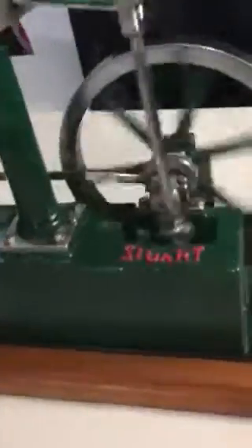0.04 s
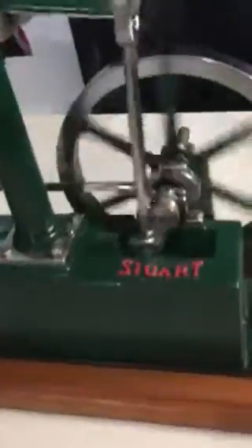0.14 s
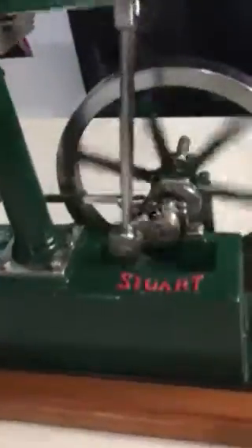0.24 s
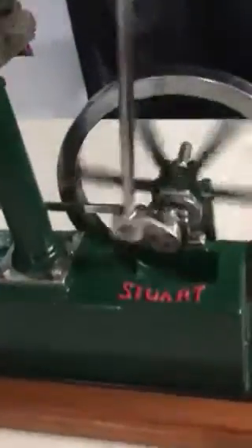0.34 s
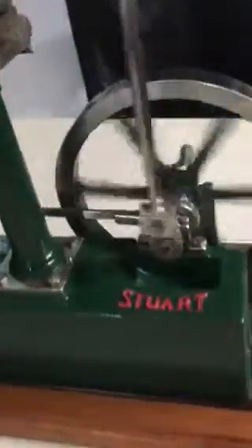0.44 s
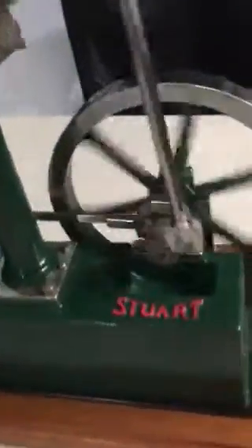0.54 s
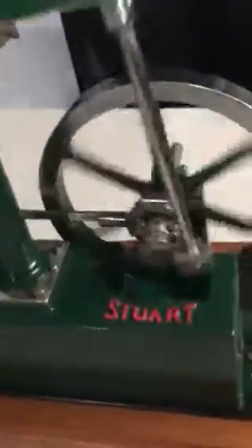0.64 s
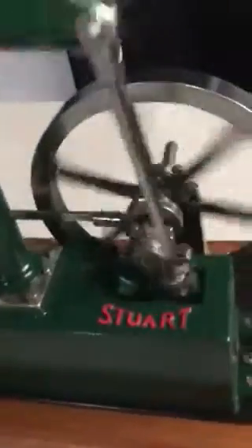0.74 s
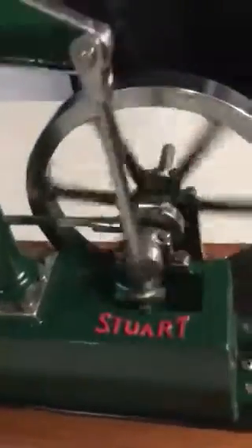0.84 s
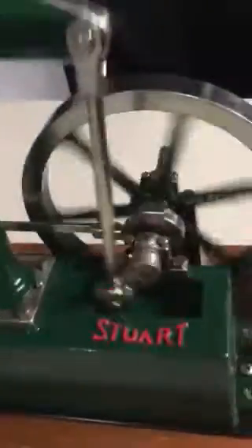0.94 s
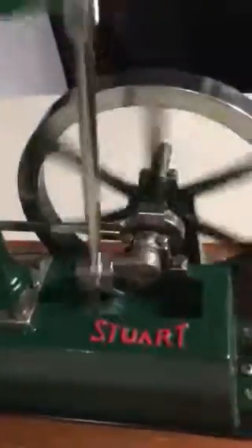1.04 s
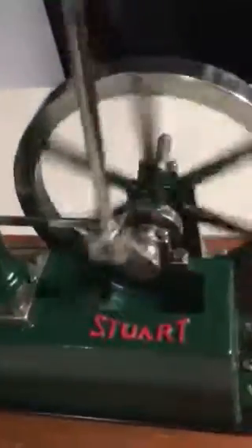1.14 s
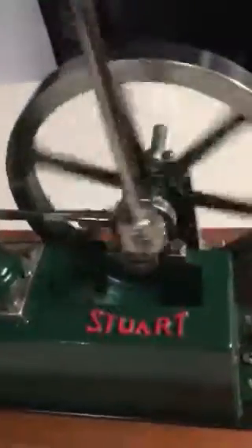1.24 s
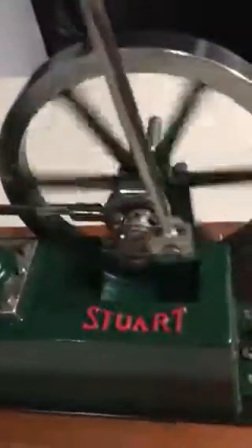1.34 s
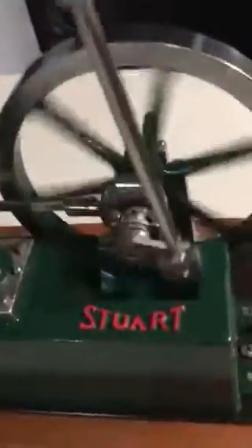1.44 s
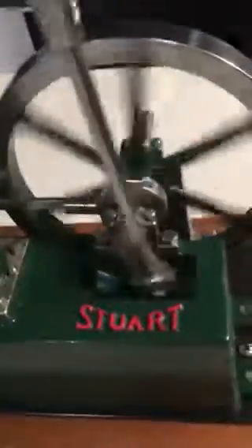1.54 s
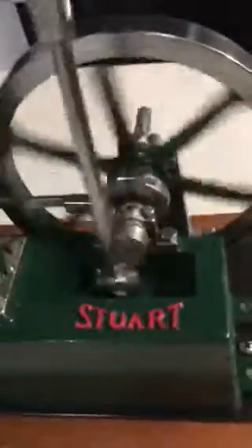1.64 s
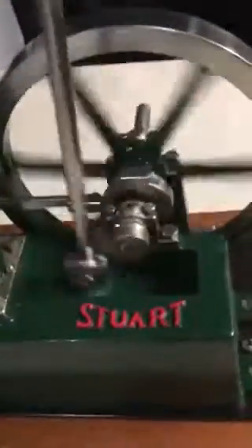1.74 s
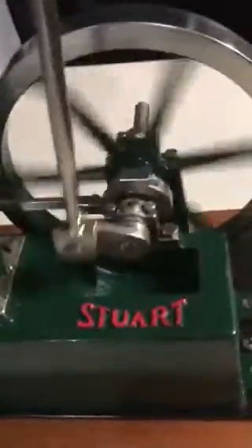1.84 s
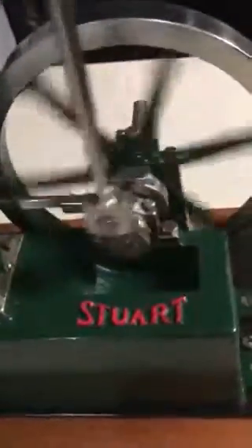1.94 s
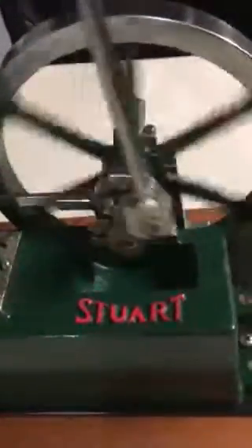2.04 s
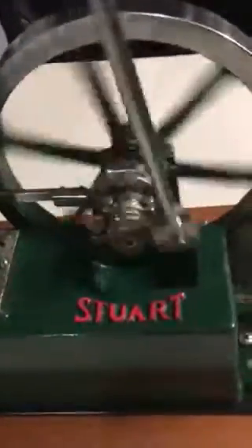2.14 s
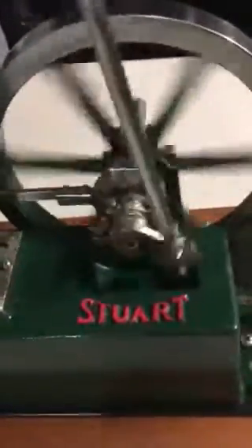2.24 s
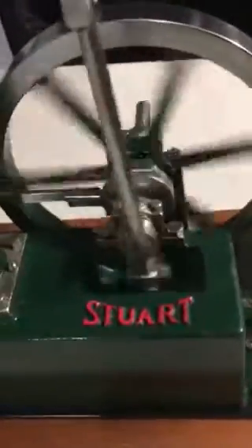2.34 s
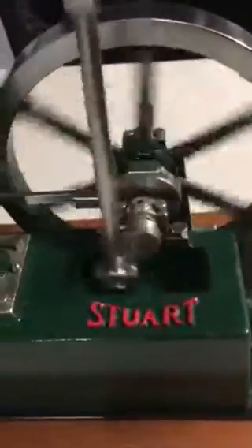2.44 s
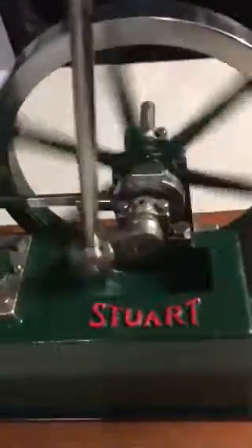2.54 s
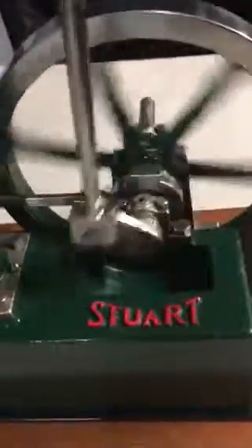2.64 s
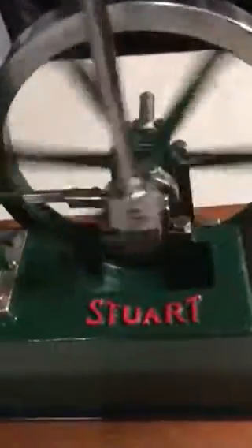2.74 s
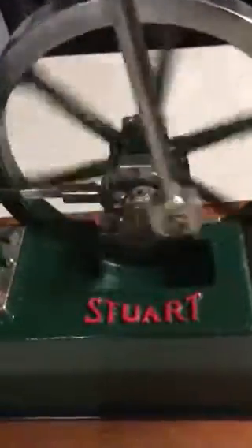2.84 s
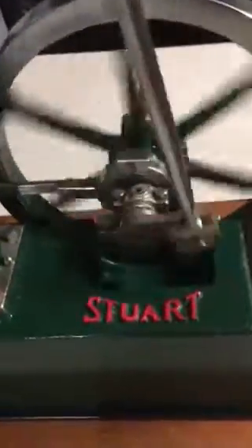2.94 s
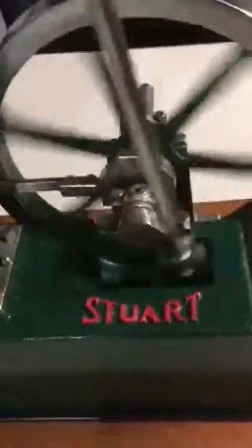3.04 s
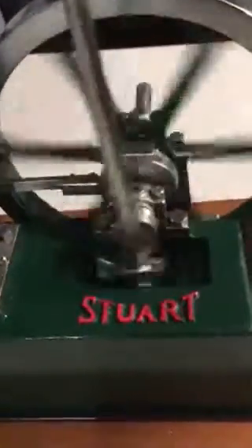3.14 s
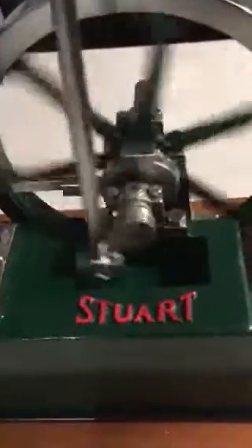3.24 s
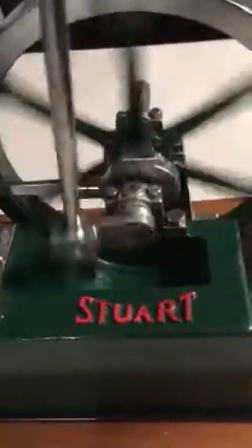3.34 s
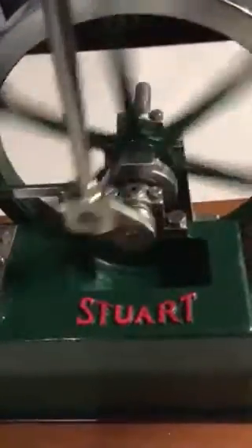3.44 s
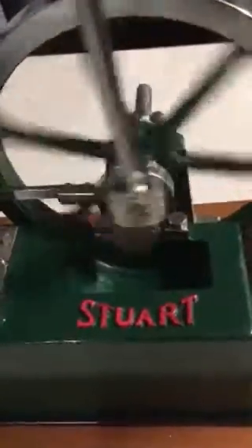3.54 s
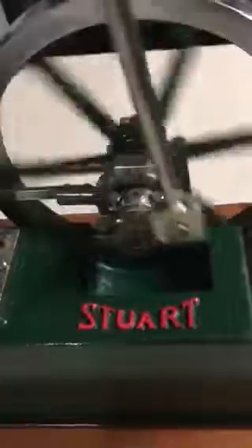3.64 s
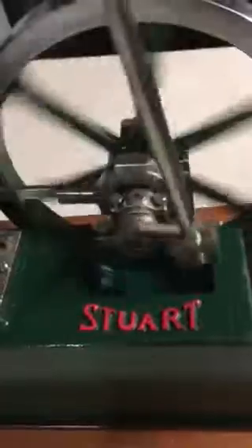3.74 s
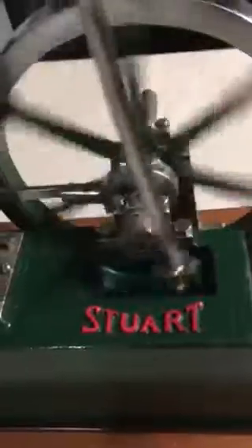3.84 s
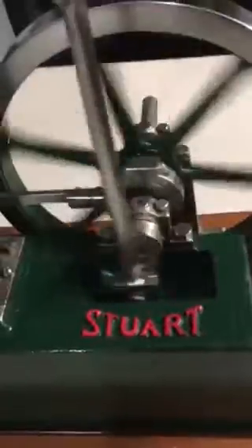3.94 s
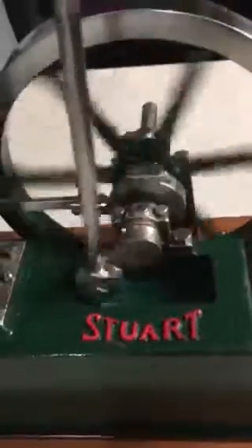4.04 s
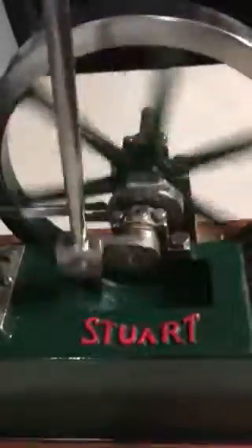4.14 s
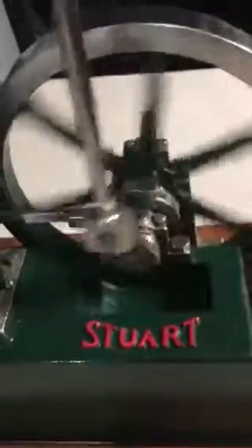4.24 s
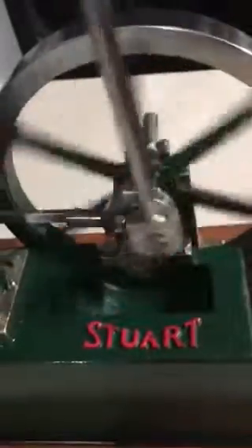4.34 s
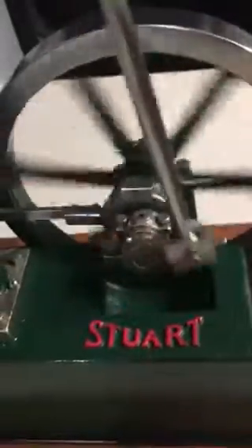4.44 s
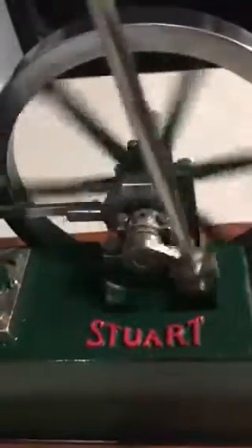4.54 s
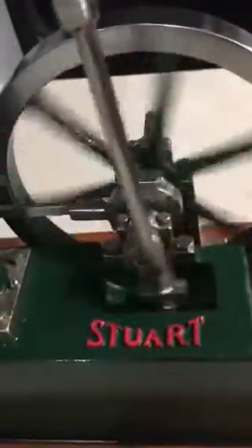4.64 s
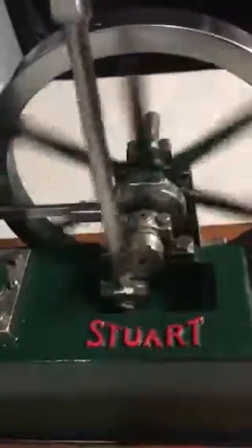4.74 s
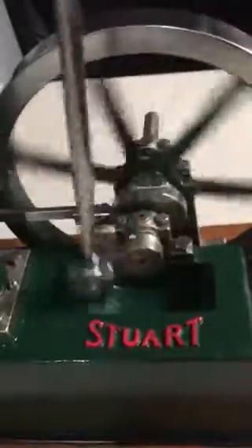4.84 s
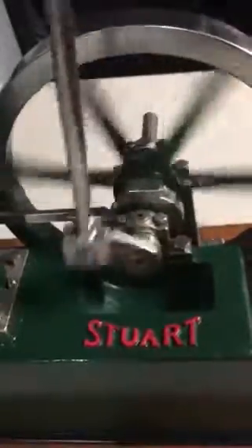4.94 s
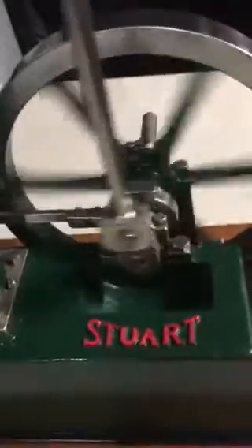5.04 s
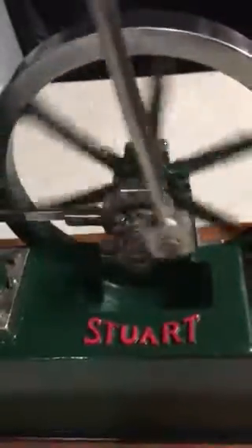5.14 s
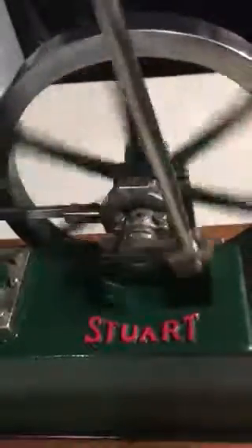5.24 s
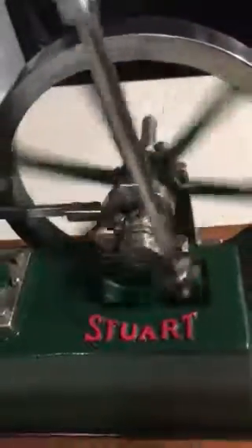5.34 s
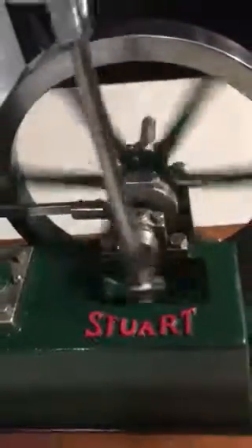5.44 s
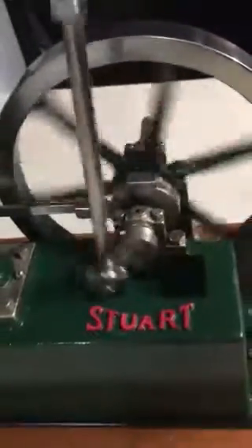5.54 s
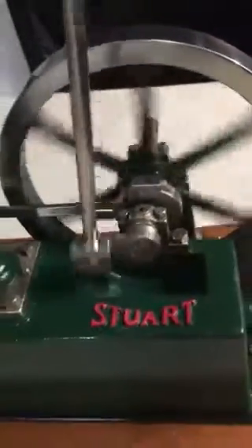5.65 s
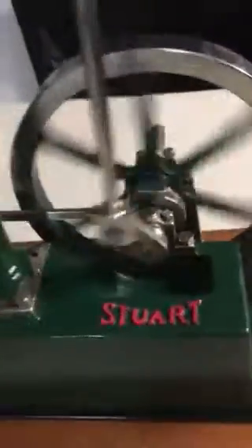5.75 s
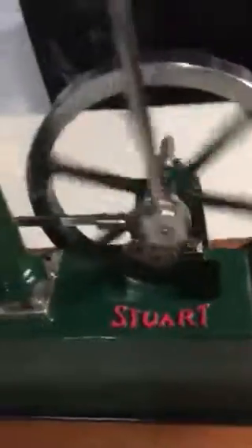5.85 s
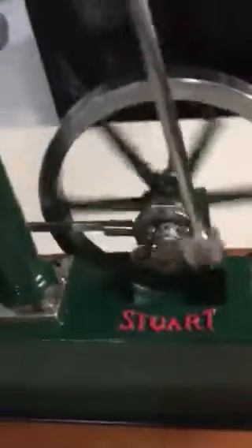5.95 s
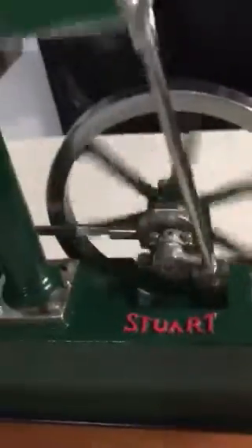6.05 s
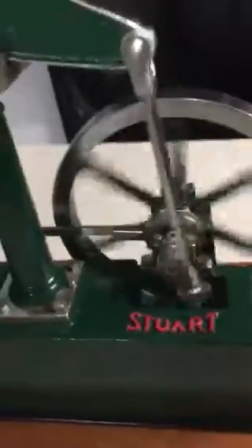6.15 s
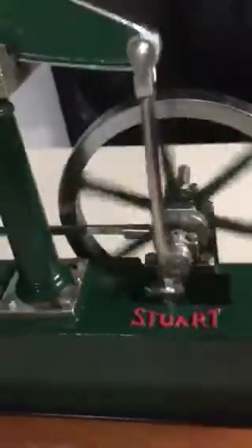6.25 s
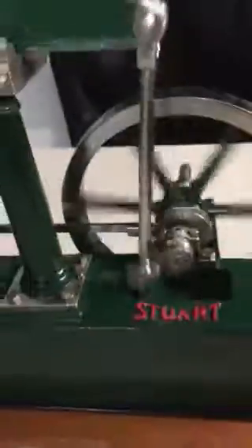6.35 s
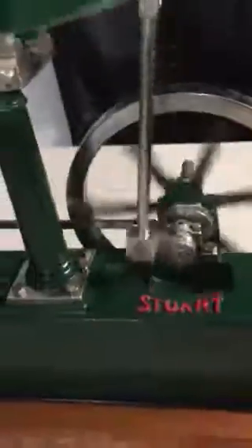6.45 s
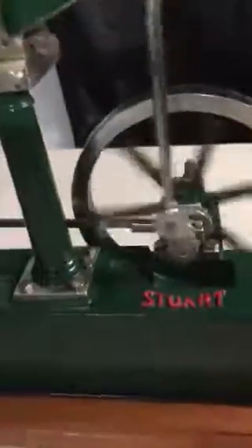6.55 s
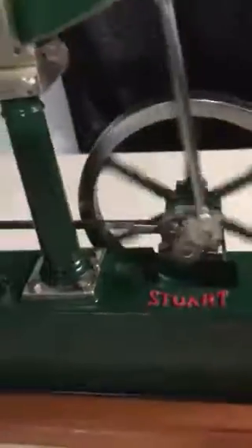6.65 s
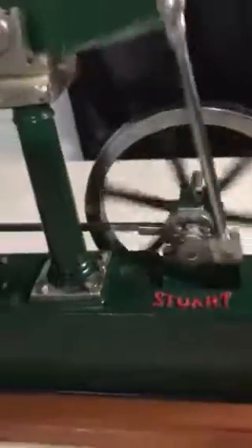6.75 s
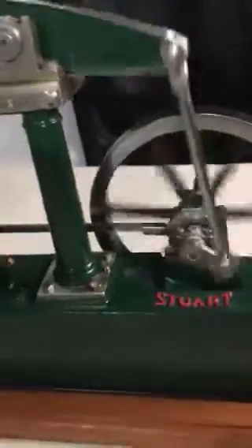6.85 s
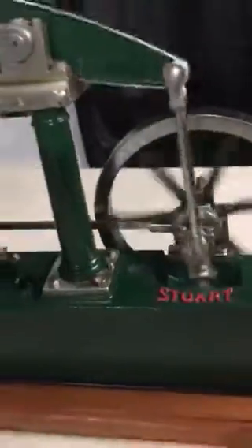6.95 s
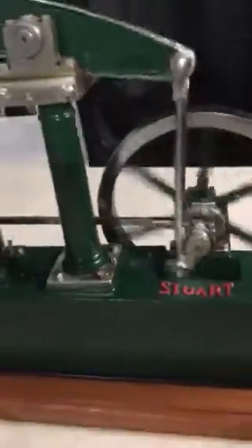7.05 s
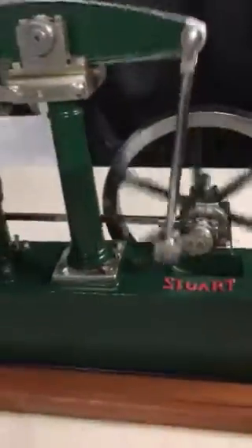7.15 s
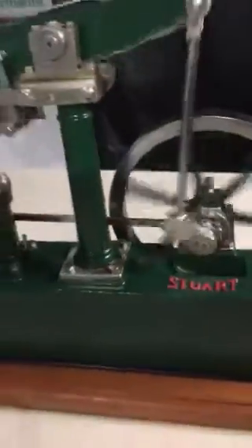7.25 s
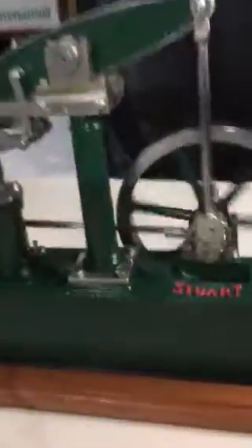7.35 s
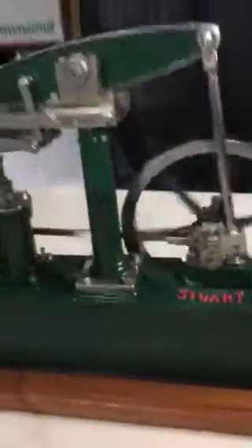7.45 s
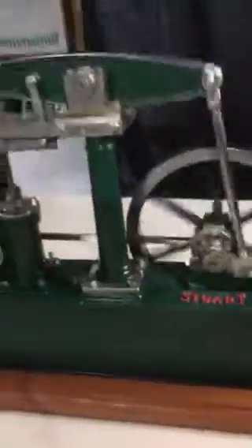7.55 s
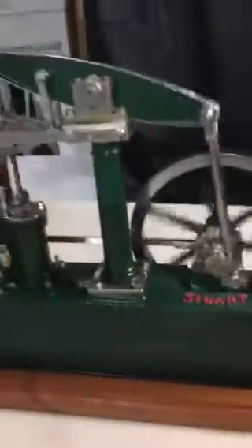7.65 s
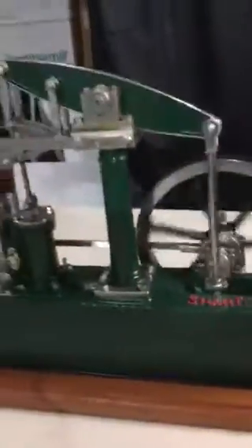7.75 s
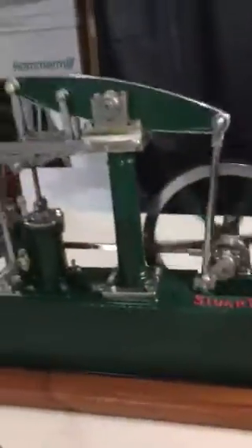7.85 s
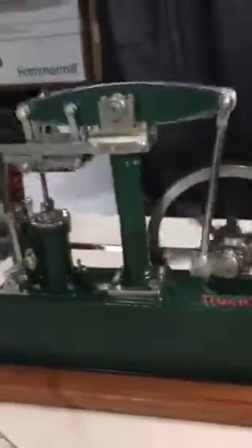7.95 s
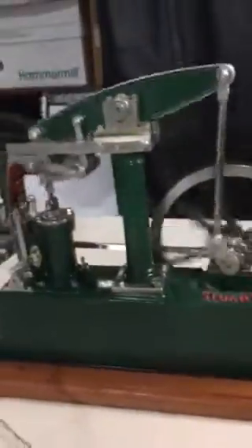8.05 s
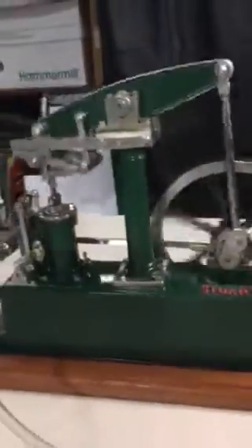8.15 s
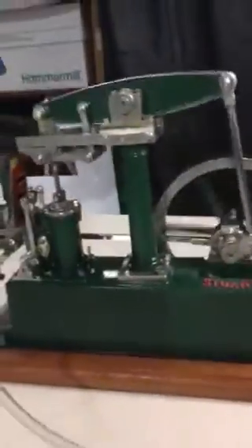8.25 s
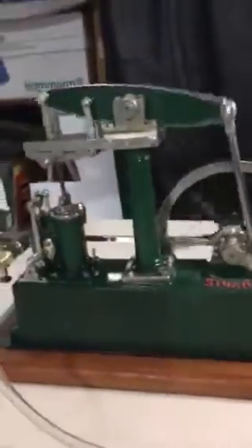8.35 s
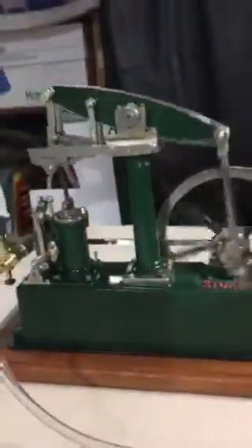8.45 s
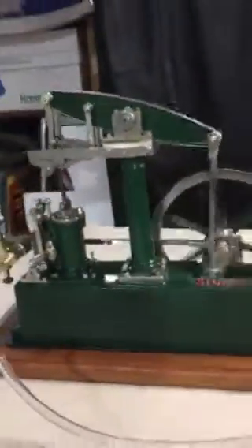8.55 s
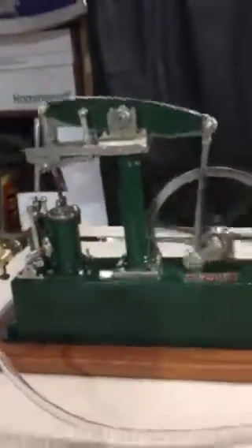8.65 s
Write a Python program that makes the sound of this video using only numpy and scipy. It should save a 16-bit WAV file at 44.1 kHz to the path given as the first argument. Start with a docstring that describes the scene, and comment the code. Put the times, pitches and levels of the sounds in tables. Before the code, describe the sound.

Evenly repeating metallic ticks, sharp knocks and softer taps from a model steam engine on a wooden table, with a light pulsing hiss.

```python
"""A hiss of exhaust, soft taps, then a sharp knock: a model beam engine at about 80 turns a minute.
It stands on a wooden table in a small furnished room. Play in its bearings is taken up at the same
crank angles every turn: a few ticks, one knock, softer taps on the way back. The blows ring steel,
rod, bed casting, plinth and table; the exhaust hisses twice a turn. The microphone, a hand-held phone,
starts beside the cylinder, moves in to 16 cm from the crank and backs off to 38 cm late on."""
import sys
import numpy as np
from scipy import signal
from scipy.fft import rfft, irfft, next_fast_len
from scipy.io import wavfile
from scipy.ndimage import uniform_filter1d

SR = 44100
rng = np.random.default_rng(int(sys.argv[2]) if len(sys.argv) > 2 else 0)


def master(y):
    """Save y as 16-bit WAV."""
    cut = np.clip(np.atleast_2d(y).T, -1, 1)
    pcm = np.round(cut * 32767)  # scale
    wavfile.write(sys.argv[1], SR, pcm.astype(np.int16))


N = 383669
T = np.arange(N) / SR

# the crank bearing's knock, once a turn: (time [s], knock gain [dB], gain of its lead-in contacts [dB])
KNOCKS = [(0.61, 1, 1.5), (1.3717, -2.5, 2.5), (2.136, -.5, 0.5), (2.9071, 1, 2), (3.6603, 0.8, -11),
          (4.4319, 0, 0.5), (5.1936, -0.5, 1.5), (5.9535, 0, -1.5), (6.7151, -1, -1), (7.4782, 1, 0.5),
          (8.244, -1, 0)]
# microphone path: (time [s], distance from the crank [m], towards the cylinder [0-1], hiss gain [dB])
MIC_PATH = [(0, 0.18, 1, -2.5), (.4, 0.26, 0.53, -2.5), (.8, .18, 0, -2.5), (5.6, 0.16, 0, -2.5),
            (6.2, .19, 0.29, -2.5), (6.8, 0.2, 0.86, -2), (7.6, 0.3, 0.86, -1.5), (8.2, 0.29, 0.88, -4),
            (8.7, 0.38, 0.6, -5.5)]


def bearings(close_m=.17, scatter_db=1.16, snap_s=.2182, snap_db=-33):
    """Play is taken up by the same contacts every turn; the blows fade as the microphone backs off."""
    # contacts within the ticks, the lead-in, the knock and the return taps:
    # (delay [s], chatter [s], steel [dB], rod [dB], bed [dB], plinth [dB], table [dB])
    tick_contacts = [(0, 0.0011, -45.5, -41.5, -44, -54.5, -52), (.006, 0.0011, -52, -50.5, -45, -64, -82),
                     (0.0163, .0006, -52, -51, -66, -52, -63), (.028, 0.0097, -46, -50, -47.5, -56, -73)]
    lead_contacts = [(-.0315, 0.0011, -48.5, -42.5, -39, -40.5, -46.5),
                     (-.0079, 0.00039, -33.5, -40.5, -36.5, -38, -50),
                     (-.0022, 0.0014, -36, -38.5, -30, -41.5, -72)]
    knock_contacts = [(0, 0.00051, -26, -42, -22, -25.5, -32.5), (.0016, 0.0014, -38, -25, -27.5, -50, -80),
                      (0.082, 0.0047, -70, -74, -49.5, -43, -44.5)]
    return_contacts = [(-.0695, 0.00095, -65, -36.5, -43, -66, -60.5),
                       (-.0008, 0.00034, -57, -34.5, -40.5, -39.5, -47.5),
                       (.011, 0.0019, -72, -56, -46.5, -53, -40),
                       (0.063, 0.0029, -46, -44, -46, -39.5, -38.5),
                       (0.076, 0.0072, -45, -43, -38.5, -41.5, -39.5),
                       (0.088, 0.0062, -50, -66, -66, -38.5, -42.5),
                       (0.105, 0.01, -68, -77, -75, -39.5, -42)]
    knocks = np.array(KNOCKS)
    ticks = each_turn(lag_s=-.0768, db=2.5, late_s=.0223)  # the valve gear, ahead of each knock
    groups = [(ticks, tick_contacts), (knocks[:, [0, 2]], lead_contacts),
              (knocks[:, [0, 1]], knock_contacts), (returns(), return_contacts)]
    forces = np.zeros((5, N))
    # how far each part follows a blow's gain: wide wooden boards sound much the same from everywhere
    follows = [1.3, 1, .83, .38, .38]
    for events, contacts in groups:
        for s, close_db in events:
            distance_m = curves(MIC_PATH, s)[0]
            db = close_db + 20 * np.log10(close_m / distance_m)
            for delay, chatter, *parts_db in contacts:
                force = contact(chatter) * undb(scatter_db * rng.standard_normal())
                for track, part_db, follow in zip(forces, parts_db, follows):
                    add(track, s + delay, force * undb(part_db + follow * db))
    # one tap lands hard and bright, on steel alone
    snap = signal.lfilter(*signal.butter(3, 12000, "high", fs=SR), contact(.0002))
    add(forces[0], snap_s, snap * undb(snap_db))
    return ringing_parts(forces)


def contact(chatter_s, clean_s=.0013, crossover_hz=800):
    """Force of one contact: a push whose treble is a clean blow when brief, a scrape when long."""
    t = T[:SR // 16]
    blow = signal.unit_impulse(len(t))
    scrape = rng.standard_normal(len(t)) * np.exp(-t / chatter_s)
    scrape_share = chatter_s ** 2 / (chatter_s ** 2 + clean_s ** 2)
    rough_blow = blow * np.sqrt(1 - scrape_share) + scrape * np.sqrt(scrape_share / np.sum(scrape ** 2))
    low, high = (signal.butter(2, crossover_hz, kind, fs=SR) for kind in ("low", "high"))
    push = signal.lfilter(*low, signal.lfilter(*low, blow))
    treble = signal.lfilter(*high, signal.lfilter(*high, rough_blow))
    return push + treble


def ringing_parts(forces):
    """Five parts ring. Bending waves are slower at low pitch: the steel speaks first, the table last."""
    # modes of each part: (frequency [Hz], relative level [dB], t60 [s])
    steel = [(4680, -9, 0.0091), (5860, -3, 0.0064), (6690, 4, 0.0057), (7014, 2.5, 0.0063),
             (8050, 3.5, 0.0033), (9200, 1.5, 0.003), (10000, -2, 0.0041), (11560, 1.5, 0.0031),
             (13660, 1.5, 0.0022)]
    rod = [(1680, -0.5, 0.013), (2037, 0, 0.014), (2210, 0.5, 0.015), (2690, 0, 0.0081),
           (3320, -11.5, 0.014), (4056, -5.5, 0.01), (5540, -2.5, 0.0066), (6620, -4.5, 0.0059)]
    bed_casting = [(730, -8, 0.019), (948, -7, 0.025), (1172, 1.5, 0.011), (1574, 2, 0.02),
                   (2005, 6.5, 0.011), (2550, 2, 0.012), (2820, -4.5, 0.0094), (3250, -6.5, 0.0073),
                   (3875, -0.5, 0.0093)]
    wooden_plinth = [(196, 0.5, 0.065), (241, 0, 0.029), (339, -8.5, 0.042), (404.7, -13, 0.044),
                     (485, -15.5, 0.049), (638, -12, 0.061), (779, -13.5, 0.034), (976, -9.5, 0.025)]
    wooden_table = [(138.7, -0.5, 0.17), (177, -12, 0.21), (206.3, -4, 0.22), (236.6, -4.5, 0.072),
                    (279.7, -5, 0.11), (325, -12, 0.12), (388.7, -13.5, 0.093)]
    rings = [ring(steel, rise_s=.000067, lag_s=.00003),
             ring(rod, rise_s=.0023, lag_s=.000321),
             ring(bed_casting, rise_s=.00063, lag_s=.000812),
             ring(wooden_plinth, rise_s=.0018, lag_s=.0012),
             ring(wooden_table, rise_s=.029, lag_s=.0028)]
    return sum(signal.oaconvolve(force, body)[:N] for force, body in zip(forces, rings))


def ring(modes, rise_s, lag_s):
    """A part's answer to one blow: its modes swell as the wave spreads through it, then fade."""
    t = np.maximum(T[:SR // 3] - lag_s, 0)
    # neighbouring modes swing in opposite directions where they radiate
    y = sum((-1) ** k * undb(db) * np.sin(2 * np.pi * hz * t) * np.exp(-np.log(1000) * t / t60)
            for k, (hz, db, t60) in enumerate(modes))
    y = y * (1 - np.exp(-t / rise_s))
    return y / np.sqrt(np.sum(y ** 2) / (SR / 200))  # the energy of 5 ms at rms 1


def turn_starts(turn_s=.7645):
    """Times of the knocks, with one more flywheel turn before and after."""
    s = np.array(KNOCKS)[:, 0]
    return np.r_[s[0] - turn_s, s, s[-1] + turn_s]


def each_turn(lag_s, db, late_s, bind_from_s=3.0, bind_to_s=4.15):
    """Rows (time [s], gain [dB]) of an event that comes every turn, late while the engine binds."""
    s = turn_starts() + lag_s
    s = s + late_s * ((s > bind_from_s) & (s < bind_to_s))
    return [(at, db) for at in s if 0 < at < T[-1]]


def returns():
    """The load reverses once on every way back."""
    return each_turn(lag_s=.2984, db=.83, late_s=.0055)


def crank_angle():
    """Crank angle in turns since the last knock."""
    s = turn_starts()
    return np.interp(T, s, np.arange(len(s))) % 1


def exhaust(turn, beside, flutter_db=.82, band_flutter_db=1.5, near_bend=.14):
    """Each end of the cylinder empties through the pipe once a turn; the glands leak all the time."""
    # pipe resonances: (frequency [Hz], width [Hz], rise over a far-end stroke [share],
    # near-end level [dB], far-end level [dB], gain beside the cylinder [dB])
    pipe_modes = [(1395, 186, 0.0385, -51.5, -53, -4), (1751, 910, 0.00071, -52.5, -58.5, -0.5),
                  (3026, 143.5, 0.0015, -51, -56, -1.5), (3290, 690, 0, -57.5, -63, 7.5),
                  (4750, 620, 0.0006, -51.5, -58.5, -5.5), (5048, 255, 0, -54, -59, 10),
                  (5850, 540, 0.013, -51, -59, -3), (6320, 279, 0.0066, -52, -54, -7.5),
                  (7130, 430, 0.045, -56.5, -69, 3.5), (8030, 720, 0.049, -56, -58, -6.5),
                  (8510, 300, .03, -51.5, -58.5, -3.5), (9210, 280, 0.13, -56.5, -55, 1),
                  (9600, 360, 0.031, -56, -51, -29), (10580, 750, 0.11, -55.5, -56, -6),
                  (12800, 3100, 0, -56.5, -55.5, 0.5)]
    # spectrum of the gland leak: (frequency [Hz], relative level [dB])
    leak_spectrum = [(900, -7), (1400, -1), (2400, -6), (4000, -9.5), (6200, -3.5), (7400, -9), (9500, -1),
                     (11500, -6.5), (13000, 1), (15500, -8)]
    flow_db, far = valve(turn)
    # the piston shortens the emptying space, so its resonances rise, mostly at the far end
    stroke = ((2 * turn) % 1 - .5) * (near_bend + far * (1 - near_bend))
    pipe = np.zeros(N)
    for hz, width, rise, near_db, far_db, side_db in pipe_modes:
        band = resonance(hz * (1 + rise * stroke), width)
        band_db = near_db + far * (far_db - near_db) + beside * side_db
        pipe += band * undb(band_db + band_flutter_db * wander(45))
    # beside the cylinder the puffs arrive directly, with deeper gaps between them
    puff_db = flow_db * (1 + .11 * beside) - .4
    puffs = pipe * undb(puff_db + flutter_db * wander(90))
    leak = noise(leak_spectrum, N) * undb(-53 + .052 * flow_db - 5 * beside)
    return puffs + leak


def valve(turn, edge_turns=.012, outside_swell_db=-8.5, shut_db=-19):
    """Flow in dB and the far end's share: a port opens, flow swells with piston speed, the port shuts."""
    # puffs after a knock: (port opens [turns], flow peaks [turns], port closes [turns],
    # swell width [turns], level [dB], share from the cylinder's far end [0-1])
    puffs = [(-.02, 0.229, 0.41, .085, -1, 0), (0.528, 0.686, 0.85, 0.121, -3, 0.8),
             (0.909, .93, 0.95, .03, -7.5, 1)]
    flow, far_flow = undb(shut_db), undb(shut_db) / 2
    for opens, peaks, closes, width, db, far_share in puffs:
        angle = (turn - peaks + .5) % 1 - .5 + peaks
        port = (np.tanh((angle - opens) / edge_turns) - np.tanh((angle - closes) / edge_turns)) / 2
        swell = np.exp(-.5 * ((angle - peaks) / width) ** 2)
        puff = np.abs(port) * undb(db + outside_swell_db * (1 - swell))
        flow, far_flow = flow + puff, far_flow + far_share * puff
    return 20 * np.log10(flow), far_flow / flow


def rocking(return_db=-34.5, knock_db=-44, return_lag_s=.047, knock_lag_s=.0193, scatter_db=1.5):
    """The beam's weight changes sides twice a turn and gives the table a slow push."""
    # modes of the whole table swaying: (frequency [Hz], relative level [dB], t60 [s])
    sway_modes = [(56.7, -12, 0.5), (84.3, 6, 0.4), (112, -10, 0.11), (134.46, -8, 0.62)]
    track = np.zeros(N)
    for events, db, lag_s in ((returns(), return_db, return_lag_s), (KNOCKS, knock_db, knock_lag_s)):
        push = ring(sway_modes, rise_s=.05, lag_s=lag_s) * undb(db)
        for s, *_ in events:
            add(track, s, push * undb(scatter_db * rng.standard_normal()))
    return track


def shadow(blows, beside, depth=.22, hz=2500, width_hz=2600):
    """With the microphone beside the cylinder, column and casting screen off part of the crank's ring."""
    band = signal.lfilter(*signal.iirpeak(hz, hz / width_hz, fs=SR), blows)
    return blows - depth * beside * band


def room(blows, t60_s=.28, onset_s=.0012, wet_db=-14):
    """Dense, dull reflections from a small furnished room."""
    # colour of the reflections: (frequency [Hz], relative level [dB])
    echo_spectrum = [(60, -18), (150, 0.5), (350, -0.5), (550, -5), (1300, -2), (1900, -12), (2700, -18),
                     (5000, -14), (15000, -17)]
    t = T[:SR // 2]
    onset = 1 - np.exp(-(t / onset_s) ** 2)
    tail = noise(echo_spectrum, len(t)) * np.exp(-np.log(1000) * t / t60_s) * onset
    return signal.fftconvolve(blows, tail / np.sqrt(np.sum(tail ** 2)))[:N] * undb(wet_db)


def background(rush_rise_db_per_s=15.5):
    """The engine's wavering drone through the table, room rumble and a faint rush that swells late on."""
    # spectrum of the room's rumble: (frequency [Hz], relative level [dB])
    rumble_spectrum = [(20, -28), (40, -5), (60, -9), (85, -21), (110, 0), (200, -4.5), (350, -13),
                       (700, -14.5), (1500, -23), (5000, -23)]
    rush_db = -56.5 + rush_rise_db_per_s * (T - 8.85)
    hollow_rush = (resonance(620, 120) + undb(-6) * resonance(830, 410)) * undb(rush_db)
    rumble = noise(rumble_spectrum, N) * undb(-56.5)
    engine_drone = (resonance(58, 7) + resonance(84, 5.8)) * undb(-60)
    return rumble + engine_drone + hollow_rush


def resonance(hz, width_hz):
    """Turbulence in one resonance whose centre may move, rms 1."""
    offset = np.fft.fftfreq(next_fast_len(N), 1 / SR)
    inside = np.abs(offset) < 2 * width_hz
    spectrum = np.zeros(len(offset), complex)
    draws = rng.standard_normal((2, len(offset)))[:, inside]
    spectrum[inside] = (draws[0] + 1j * draws[1]) * .5 ** (2 * (offset[inside] / width_hz) ** 2)
    phase = 2 * np.pi * np.cumsum(np.broadcast_to(hz, N)) / SR
    return unit(np.real(np.fft.ifft(spectrum)[:N] * np.exp(1j * phase)))


def noise(spectrum, size):
    """Noise of a given spectrum, rms 1."""
    hz, db = np.transpose(spectrum)
    f = np.maximum(np.fft.rfftfreq(size, 1 / SR), 1)
    gain = undb(np.interp(np.log(f), np.log(hz), db))
    return unit(irfft(rfft(rng.standard_normal(size)) * gain, size))


def wander(rate_hz):
    """A smooth random drift, rms 1."""
    hold = int(SR / rate_hz)
    steps = np.repeat(rng.standard_normal(N // hold + 1), hold)[:N]
    return unit(uniform_filter1d(steps, hold))


def curves(rows, at):
    """The columns of a table, joined by straight lines."""
    where, *columns = np.transpose(rows)
    return [np.interp(at, where, c) for c in columns]


def add(track, s, sound):
    """Mix a sound into a track at a time."""
    i = max(int(s * SR), 0)
    part = sound[:max(len(track) - i, 0)]
    track[i:i + len(part)] += part


def undb(db):
    return 10 ** (np.asarray(db) / 20)


def unit(x):
    return x / np.sqrt(np.mean(x ** 2))


def scene(echo_side_db=4.0):
    """Blows and their echo, the table's sway, the exhaust and the background at one moving microphone."""
    _, beside, hiss_db = curves(MIC_PATH, T)
    blows = bearings()
    echo = room(blows) * undb(echo_side_db * beside)  # towards the cylinder the room's share grows
    sway = rocking()
    hiss = exhaust(crank_angle(), beside) * undb(hiss_db)
    return (shadow(blows, beside) + echo + sway + hiss + background())[None]


def record(dry, top_hz=16000):
    """The phone rounds the sharpest peaks and cuts the top."""
    return signal.sosfilt(signal.ellip(8, .2, 70, top_hz, fs=SR, output="sos"), np.tanh(dry))


dry = scene()
out = record(dry)
master(out)
```